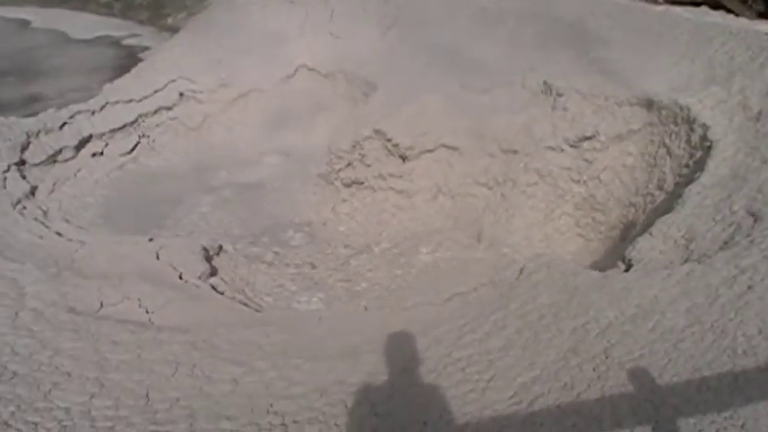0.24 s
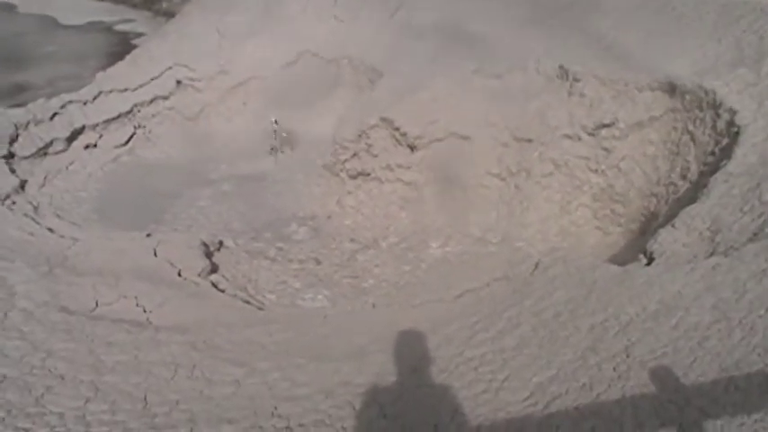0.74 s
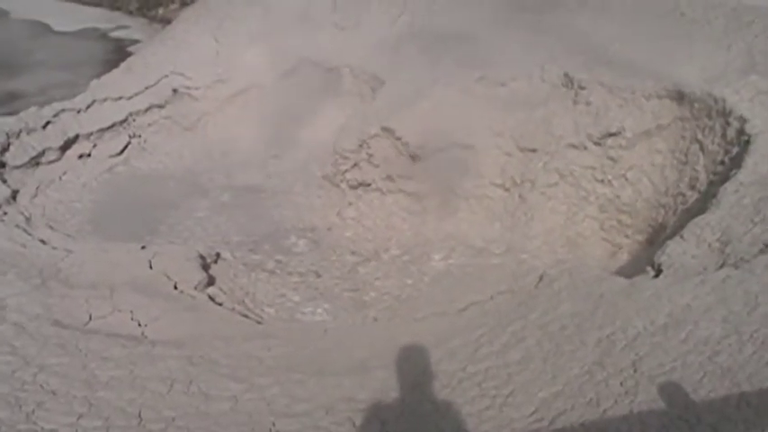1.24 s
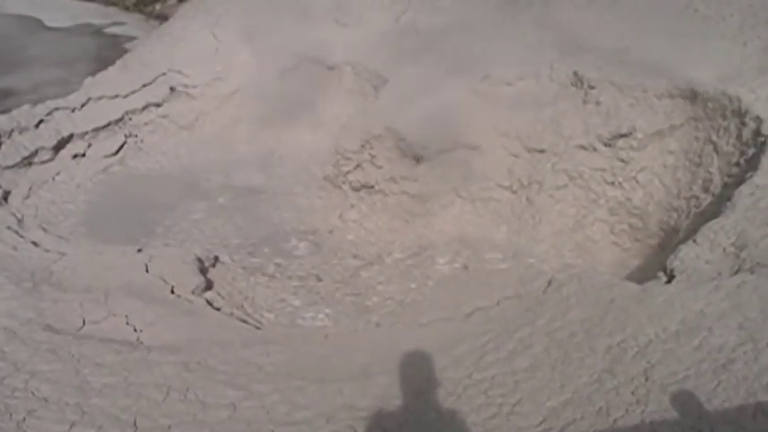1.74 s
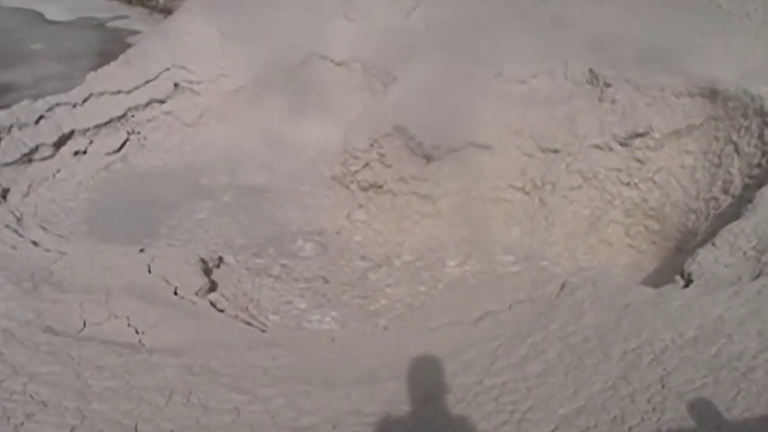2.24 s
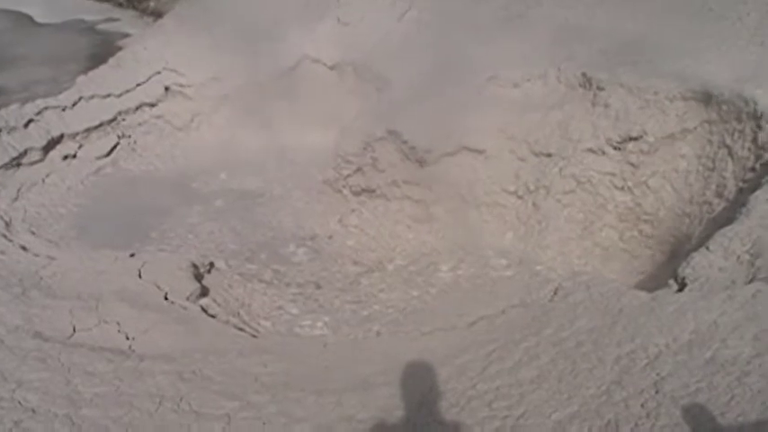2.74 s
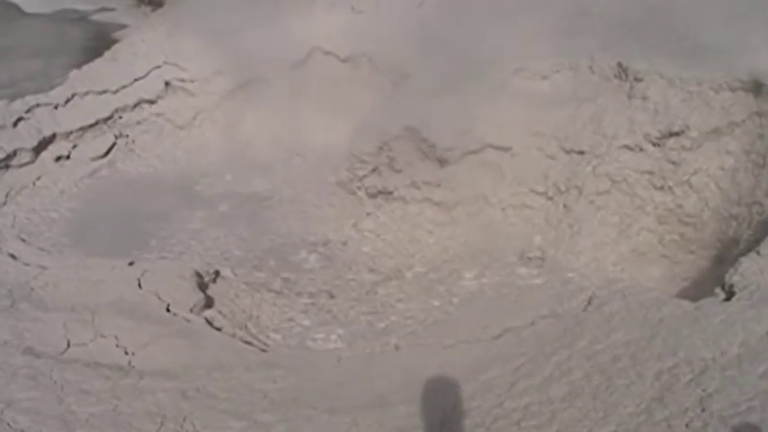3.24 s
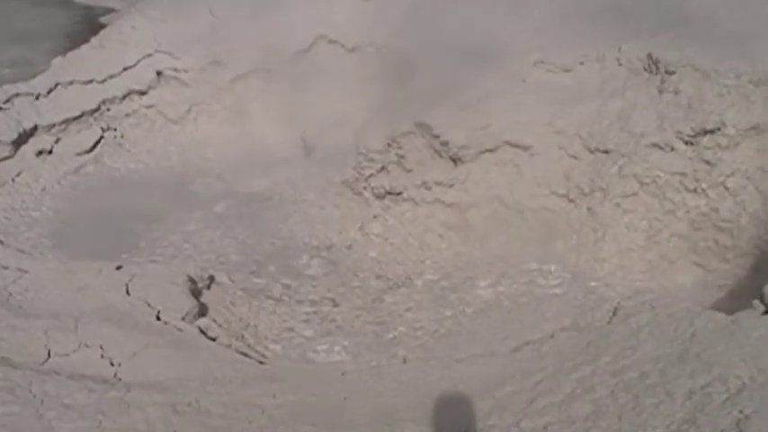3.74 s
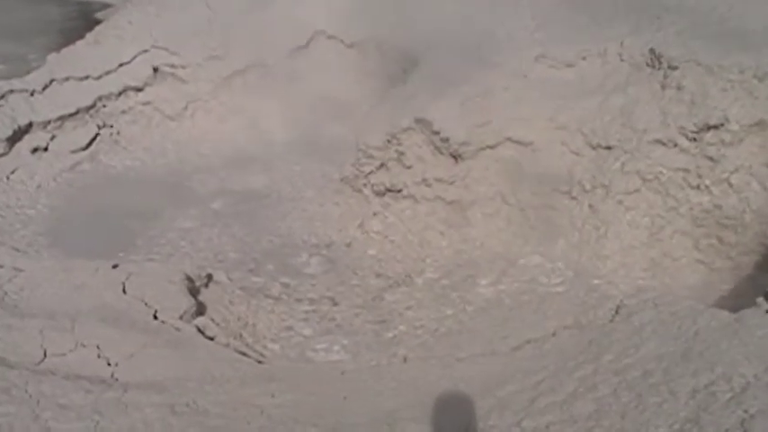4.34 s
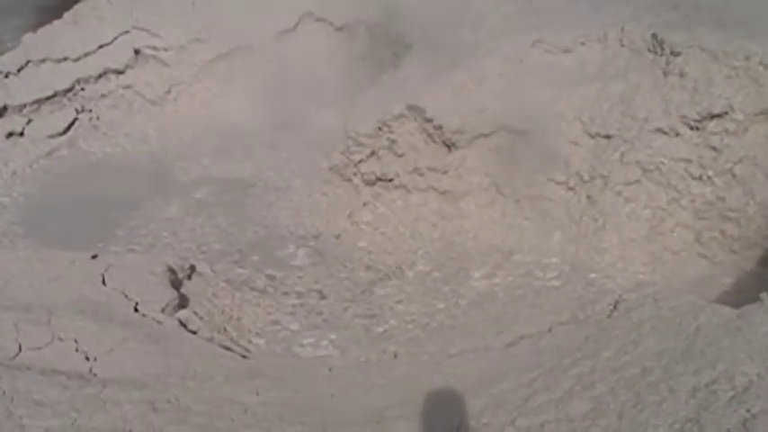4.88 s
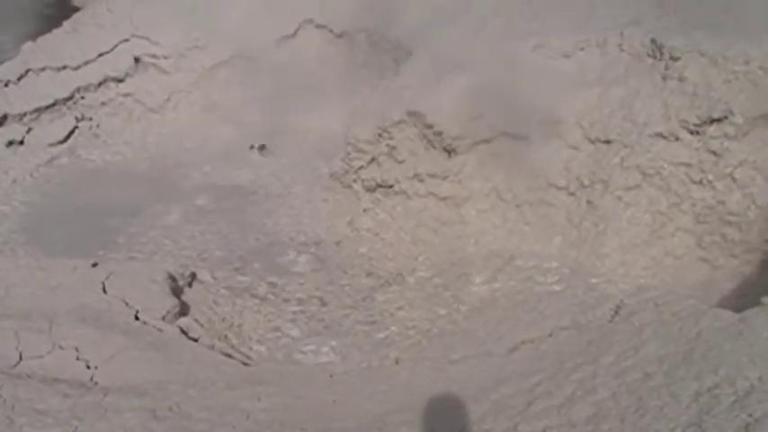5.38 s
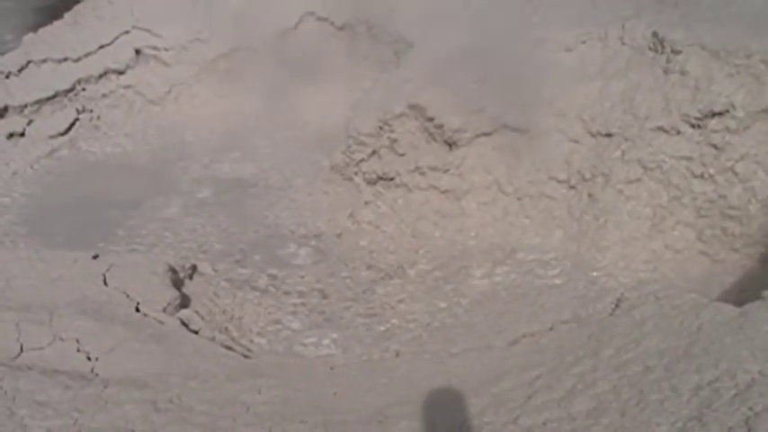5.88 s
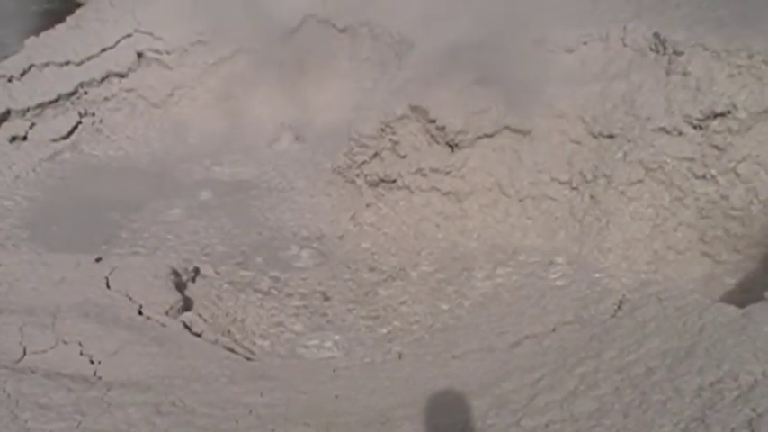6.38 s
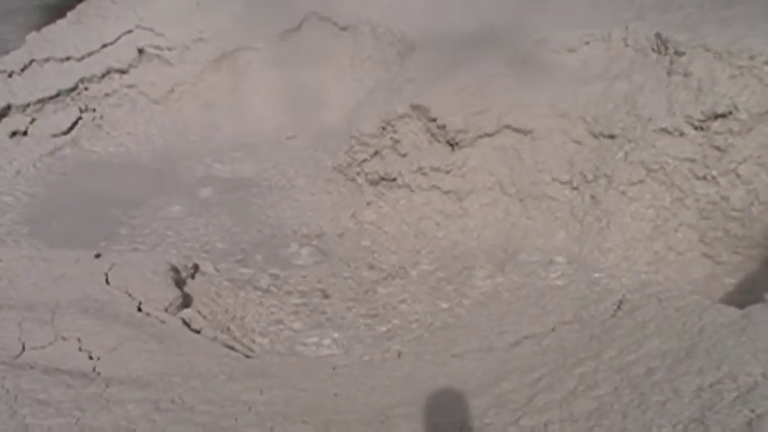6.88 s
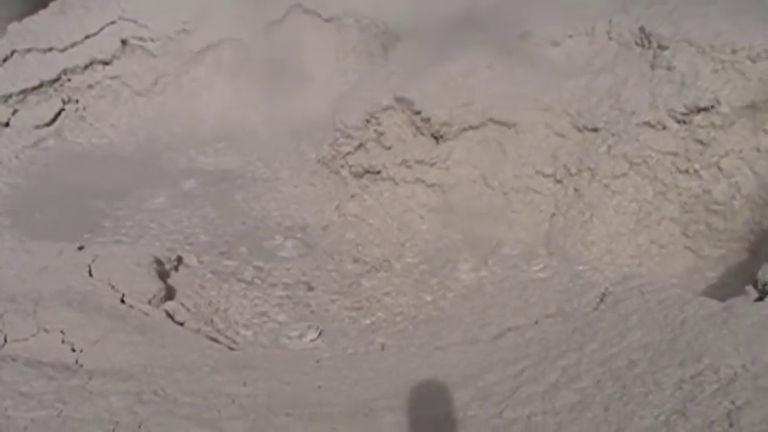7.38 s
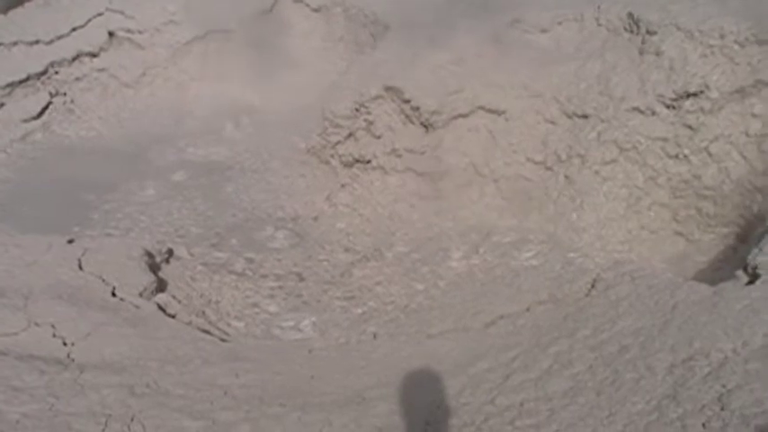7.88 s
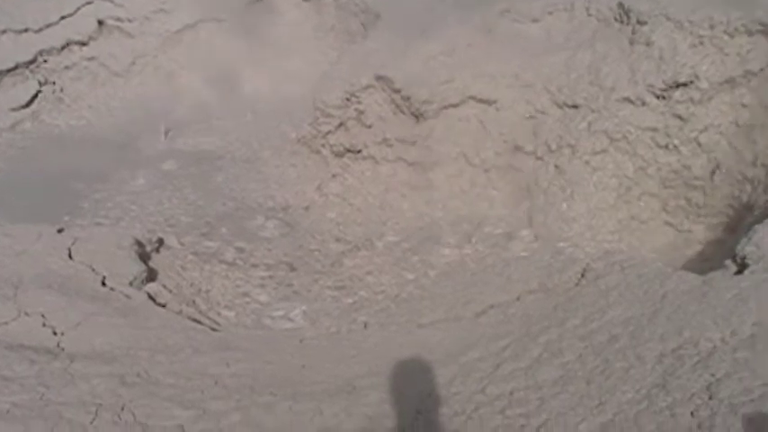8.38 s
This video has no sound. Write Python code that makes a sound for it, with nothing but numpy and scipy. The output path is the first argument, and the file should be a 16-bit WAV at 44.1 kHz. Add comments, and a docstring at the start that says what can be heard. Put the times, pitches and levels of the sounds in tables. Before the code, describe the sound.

A pot of thick mud boils outdoors, close in stereo. A soft, grainy simmer with fine wet spatter runs throughout, swelling and thinning unevenly. From the start to about 2.6 s a dry, raspy, high bird trill repeats about fifteen times a second, slowing slightly. Under it come small gulps, a clear hollow pop at 0.4 s, and a lively burst of spatter and sharp snaps around 0.9-1.1 s. After a sparser stretch, fuller plops come at 3.5 and 3.9 s, with pops near 4.5 s. A dense cluster of round gulps and splashes falls at 5.0-5.4 s, the heaviest low plop at 6.2 s, others at 7.45 and 8.0 s. From 2.6 s faint, high cricket chirps come in broken groups; weak rising bird calls appear after 7 s. Reflections are short, bass is thin, and a barely audible very high whine stays steady to the end at about 8.6 s.

```python
"""Boiling mud pot

A pot of thick mud boils in the open air. Steam pockets gulp as short gliding tones; bubbles pop open as
ringing cavities with noise bursts for splash and spray; flung specks snap as narrow bands of grit.
Coloured grit and small tonal bubbles make the simmer and spatter throughout. Far off, gliding whistles
make a bird's opening trill, its later calls and the crickets; the camera adds a faint steady whine.
"""
import sys
import numpy as np
from scipy import signal
from scipy.fft import rfft, irfft, next_fast_len
from scipy.io import wavfile
from scipy.ndimage import uniform_filter1d, map_coordinates

SR = 44100
rng = np.random.default_rng(int(sys.argv[2]) if len(sys.argv) > 2 else 0)


def digitize_waveform(pressure):
    """Quantize a signal to 16-bit integers and store it at the path in sys.argv[1].

    Rows of a 2-D input are taken as channels; values are limited to [-1, 1].
    """
    field = np.atleast_2d(pressure).T
    bounded = np.clip(field, -1, 1)
    quanta = np.round(bounded * 32767).astype(np.int16)
    wavfile.write(sys.argv[1], SR, quanta)


N = 380141
AGE = np.arange(SR // 8) / SR  # seconds since the start of one short event

# bubbles bursting open, levels ahead of the trims in pops(): start_s, ring_db, cavity_pitch_hz, splash_db
POPS = [(0.133, -32, 920, -38.5), (0.244, -31.5, 700, -35), (0.266, -29, 1880, -38.5),
        (0.4257, -17, 1250, -33.5), (0.7685, -31, 760, -34.5), (0.865, -29.5, 1720, -44),
        (0.9636, -30, 2110, -39.5), (1.017, -33, 1150, -35.5), (2.217, -34, 674, -32),
        (2.411, -40, 600, -63), (2.7365, -47, 990, -36), (3.045, -36.5, 870, -41),
        (3.0784, -24.5, 925, -39), (3.477, -46, 1160, -34.5), (3.522, -23.5, 873, -34.5),
        (3.533, -28, 860, -45), (3.8815, -31, 890, -42), (3.927, -19.5, 730, -43),
        (3.929, -21.5, 1630, -34), (3.9344, -24, 734, -52), (4.199, -32, 720, -50),
        (4.459, -22, 1120, -31.5), (4.471, -31, 820, -38), (4.493, -29.5, 1670, -37.5),
        (4.691, -34, 1166, -41), (4.971, -33.5, 602, -47), (5.011, -17.5, 2120, -35.5),
        (5.163, -31.5, 765, -61), (5.226, -30.5, 573, -34.5), (5.3446, -29, 1680, -39),
        (5.433, -29, 983, -48.5), (5.710, -20.5, 2070, -38), (6.223, -25.5, 636, -28.5),
        (6.2384, -22, 757, -50), (6.2443, -30, 860, -35.5), (6.548, -27, 2010, -38),
        (6.873, -24.5, 907, -41), (7.009, -40.5, 584, -62), (7.098, -39, 545, -30.5),
        (7.132, -32, 1120, -39), (7.460, -28.5, 1170, -38.5), (7.6776, -34, 696, -36.5),
        (7.9887, -18.5, 880, -33), (7.999, -24, 1310, -43), (8.141, -34, 1100, -40.5),
        (8.272, -32, 860, -63)]
# colour of the fine spray: frequency_hz, level_db (only the shape counts)
SPRAY = [(1500, 10.5), (3300, 10.5), (4600, 10), (7000, 9), (10000, 6.5), (13000, -11), (15500, -56)]
# the steady boil, ahead of its trims: time_s, simmer_db, spatter_db
BOIL = [(0.0, -49.5, -59), (0.19, -44.5, -60.5), (0.86, -47.5, -48.5), (1.32, -49.5, -61.5),
        (2.04, -52, -63), (3.02, -51.5, -67.5), (3.27, -51, -59.5), (4.05, -52, -64.5), (4.15, -51, -70),
        (5.42, -50, -64.5), (6.51, -49.5, -60), (6.96, -55, -69), (7.3, -47, -63.5), (7.78, -52, -63),
        (7.9, -49.5, -61), (8.62, -49.5, -65.5)]


def gulps():
    """Each pocket swells and the thick mud damps it at once; its pitch climbs unless a pop has opened it."""
    # steam pockets swelling under the mud: start_s, peak_db, pitch_at_peak_hz, swell_s
    pockets = [(0.096, -29.5, 169, 0.013), (0.138, -26, 315, 0.0035), (0.424, -28, 357, 0.0077),
               (0.695, -25, 256, 0.0064), (1.261, -28.5, 250, 0.0091), (1.402, -41, 264, 0.014),
               (1.71, -33.5, 305, 0.0066), (1.871, -24.5, 274, 0.0074), (2.28, -27.5, 254, 0.011),
               (2.544, -26, 254, 0.0067), (2.663, -38.5, 378, 0.0074), (3.475, -18.5, 278, 0.0022),
               (3.5006, -33, 400, 0.011), (3.8994, -19, 244, 0.0047), (4.197, -22.5, 262, 0.0034),
               (5.094, -26, 343, 0.0054), (5.162, -15.5, 233, 0.006), (5.221, -27, 427, 0.0078),
               (5.2386, -15.5, 310, 0.0023), (5.348, -22.5, 270, 0.0052), (6.072, -32.5, 276, 0.0082),
               (6.186, -12.5, 237, 0.0074), (6.212, -22.5, 344, 0.0076), (6.616, -34.5, 277, 0.0082),
               (6.638, -33.5, 320, 0.012), (7.455, -15, 237, 0.0073), (7.6749, -29, 410, 0.004),
               (7.964, -31, 229, 0.0084), (7.986, -22, 400, 0.0026), (8.23, -39, 326, 0.0095)]
    open_within_s = 0.02  # a pop this close in time has opened the pocket
    open_glide = 0.014  # an opened pocket barely climbs (share of its pitch)
    glide_per_s = 58  # a sealed one climbs by this share of its pitch for each second of swelling
    wrinkle_share = 0.13  # how far the collapsing pocket unsettles its pitch
    out = np.zeros((2, N))
    for s, db, hz, swell in pockets:
        opened = any(abs(pop[0] - s) < open_within_s for pop in POPS)
        glide = open_glide if opened else glide_per_s * swell
        u = AGE / swell
        climb = glide * np.tanh(u - 1)
        wrinkle = unit(uniform_filter1d(rng.standard_normal(len(u)), size=60))
        unsettled = wrinkle_share * np.tanh(u * u / 2) * wrinkle  # grows towards the tail
        pitch = hz * (1 + climb + unsettled)
        swelling = (u * np.exp(1 - u)) ** 3  # peaks at 1 after the swell time
        tone = np.sin(2 * np.pi * np.cumsum(pitch) / SR)
        add(out, s, amp(db) * swelling * tone, pan_db=1.2)
    return out


def pops():
    """Steam fizzes through the thinning skin, then it tears: cavity rings, rim splashes, fine spray flies."""
    # colour of the splashing rim: frequency_hz, level_db (only the shape counts)
    splash_colour = [(120, -25), (300, -4.5), (750, 26.5), (1600, 20), (2700, 23), (4000, -63.5),
                     (9000, -34)]
    # lower cavities burst lazily and fling less spray
    spray_full_hz, spray_db_per_octave = 950, 9
    # second mode: its pitch depends on the ragged shape of the hole
    overtone_ratio, overtone_spread, overtone_db = 2, 0.15, -14
    out = np.zeros((2, N))
    for s, db, hz, splash_db in POPS:
        spray_db = splash_db + spray_db_per_octave * np.log2(min(hz / spray_full_hz, 1))
        overtone_hz = hz * overtone_ratio * np.exp(rng.normal(0, overtone_spread))
        ring = amp(db + 3.5) * (cavity(hz) + amp(overtone_db) * cavity(overtone_hz))
        splash = amp(splash_db - 3) * burst(splash_colour, t60=0.087)
        spray = amp(spray_db) * burst(SPRAY, t60=0.067)
        wet_fizz = amp(splash_db - 3) * burst(splash_colour, t60=0.019)
        fine_fizz = amp(spray_db - 10.5) * burst(SPRAY, t60=0.035)
        add(out, s, ring + splash + spray, pan_db=rng.normal(0.4, 1))
        add(out, s - AGE[-1], (wet_fizz + fine_fizz)[::-1])  # reversed, it builds up to the pop
        for at, small_db, small_hz in satellites(s, splash_db):
            add(out, at, amp(small_db) * cavity(small_hz))
    return out


def cavity(hz):
    """One mode of an open cavity: a soft start, a climbing pitch and a set number of cycles."""
    ring_cycles = 26.3  # 60 dB down after this many starting periods, so small cavities are the shortest
    onset = 1 - np.exp(-AGE / 0.00019)
    return bubble(hz, rise=2.3) * fade(AGE, ring_cycles / hz) * onset


def bubble(hz, rise, t=AGE):
    """A cavity's tone climbs as its mouth opens; rise is the share of its pitch per second."""
    return np.sin(2 * np.pi * hz * (t + rise * t * t / 2))


def satellites(s, splash_db):
    """(start_s, level_db, pitch_hz) of the three small bubbles that a collapsing rim traps."""
    within_s, over_splash_db = 0.03, 6  # the later they come, the weaker
    return [(s + within_s * late, splash_db + over_splash_db - 9 * late, 1100 * 2 ** pitch)
            for late, pitch in rng.uniform([0.1, -1], [1, 1], (3, 2))]


def burst(spectrum, t60):
    """A dying shower of droplets with the energy of a unit noise under the same decay."""
    decay = fade(AGE, t60)
    drops = grit(len(AGE), spike_db=7)
    shower = unit(coloured(drops, spectrum) * decay)
    return shower * np.sqrt(np.mean(decay ** 2))


def snaps():
    """A sharp crack in a tiny, heavily damped cavity, then a trace of spray; fainter ones fall at random."""
    # tearing films and landing specks: start_s, level_db, pitch_hz
    cracks = [(0.213, -23.5, 2900), (0.366, -27, 2520), (0.571, -28.5, 2910), (0.623, -26, 7500),
              (0.682, -27.5, 10100), (0.8, -32, 6660), (0.932, -20.5, 3150), (0.963, -23, 7140),
              (1.034, -22.5, 2200), (1.0377, -19, 9900), (1.534, -21, 4220), (1.783, -29, 5200),
              (1.994, -30, 3300), (2.213, -21, 4400), (2.58, -28.5, 2900), (2.923, -19.5, 4260),
              (3.394, -28, 2700), (3.928, -22, 5000), (3.978, -34, 8500), (4.0651, -26, 7400),
              (4.155, -26.5, 7350), (4.426, -26, 4650), (4.716, -23.5, 7000), (4.779, -28, 2840),
              (5.24, -21.5, 4300), (5.712, -23.5, 2500), (5.776, -24.5, 6660), (7.845, -24, 2630),
              (8.089, -26.5, 5350), (8.125, -31.5, 5000), (8.141, -26.5, 2440)]
    rise_s, t60_s = 0.0004, 0.008
    width_share = 0.26  # bandwidth as a share of the pitch
    decay = fade(AGE, t60_s)
    envelope = decay * (1 - np.exp(-AGE / rise_s))
    out = np.zeros((2, N))
    for s, db, hz in cracks + specks(count=90):
        tear = grit(len(AGE), spike_db=2) * envelope
        width = width_share * hz

        def resonance(f):
            """A damped band around the pitch, its treble rolled off above 11.5 kHz."""
            band = 1j * f * width / (hz * hz - f * f + 1j * f * width)
            return band / (1 + (f / 11500) ** 8)

        crack = unit(filtered(tear, resonance)) * np.sqrt(np.mean(decay ** 2))
        spray = amp(db - 11) * burst(SPRAY, t60=0.023)
        add(out, s, amp(db) * crack + spray, pan_db=rng.normal(-1, 3))
    return out


def specks(count):
    """(start_s, level_db, pitch_hz) of faint snaps all over the pot, louder while it boils harder."""
    over_simmer_db, middle_hz = 11.5, 2420  # level over the untrimmed simmer, middle pitch
    s, simmer_db, _ = np.transpose(BOIL)
    return [(at, np.interp(at, s, simmer_db) + over_simmer_db + 3 * size, middle_hz * 3 ** pitch)
            for at, size, pitch in rng.uniform([0, -1, -1], [N / SR, 1, 1], (count, 3))]


def boil():
    """The pot simmers gently and surges now and then, with a fine spatter of mud raining back."""
    # colour of the simmering froth: frequency_hz, level_db (only the shape counts)
    simmer_colour = [(25, -40), (55, -19), (110, -23.5), (260, 4.5), (500, -2.5), (850, 2.5), (1400, -7.5),
                     (2600, -7.5), (3500, -15.5), (7000, -19), (15000, -72)]
    # colour of the falling spatter: frequency_hz, level_db (only the shape counts)
    spatter_colour = [(400, -70), (1700, 10), (3400, -5), (5000, 3.5), (7500, 2.5), (10000, 0.5),
                      (13000, -12), (15500, -24)]
    simmer, spatter = boiling()
    clumps = wobble(30)  # bubbles come in clumps, and the spatter with them
    froth = spread(coloured(grit((2, N), spike_db=7), simmer_colour))
    froth = patchy(amp(2.5 * clumps + 2.3 * wobble(220)) * froth, 3)
    drops = spread(coloured(grit((2, N), spike_db=7), spatter_colour))
    drops = patchy(amp(3.2 * clumps + 2.5 * wobble(400)) * drops, 2.5)
    small_bubbles = radiated(blips(10 * np.log10(simmer), count=380))
    return amp(0.5) * np.sqrt(simmer) * froth + amp(6.0) * np.sqrt(spatter) * drops + small_bubbles


def boiling():
    """Powers of simmer and spatter: the steady boil, the froth that each pop churns up, the splutters."""
    # short surges of steam, ahead of the trims in boil(): peak_s, half_width_s, level_db
    splutters = [(1.0, 0.018, -43), (1.121, .01, -49), (1.66, 0.033, -53), (1.907, 0.0098, -44.5),
                 (2.439, 0.032, -52), (2.71, 0.042, -48), (3.21, 0.054, -49), (3.838, 0.039, -44),
                 (4.15, 0.11, -47), (4.42, 0.045, -46.5), (4.698, 0.009, -49), (5.212, 0.032, -40),
                 (5.769, 0.018, -40), (5.845, .011, -51), (6.124, 0.012, -54.5), (6.373, 0.0076, -56),
                 (7.365, 0.011, -45), (7.71, 0.067, -43.5), (8.012, .02, -43.5), (8.1, 0.043, -45),
                 (8.435, 0.013, -52)]
    simmer_trim_db, spatter_trim_db = -3, -0.5
    # froth around a pop: level over its splash, half width, spatter over froth
    churn_db, churn_s, churn_spatter_db = -16.5, 0.053, -12.5
    # at this width spatter and simmer get equal power here; shorter splutters are brighter
    jet_s, jet_db_per_halving = 0.015, 6.5
    s, simmer_db, spatter_db = np.transpose(BOIL)
    t = np.arange(N) / SR
    churn = sum(surge(at, churn_s, splash_db + churn_db) for at, _, _, splash_db in POPS)
    simmer = amp(np.interp(t, s, simmer_db) + simmer_trim_db) ** 2 + churn
    spatter = amp(np.interp(t, s, spatter_db) + spatter_trim_db) ** 2 + amp(churn_spatter_db) ** 2 * churn
    for at, width, db in splutters:
        steam = surge(at, width, db)
        simmer = simmer + steam
        spatter = spatter + steam * amp(jet_db_per_halving * np.log2(jet_s / width)) ** 2
    return simmer, spatter


def surge(s, width, db):
    """The power of a smooth swell that peaks at time s."""
    distance = (np.arange(N) / SR - s) / width
    return amp(db) ** 2 * np.exp(-2 * np.minimum(distance ** 2, 20))


def blips(level_db, count):
    """Small bubbles all over the pot: a few cycles that the ragged rim unsettles, louder in a harder boil."""
    over_simmer_db = 11.5
    out, t = np.zeros((2, N)), AGE[:SR // 30]
    for place, (pitch, size, pan, rise) in zip(rng.random(count), rng.standard_normal((count, 4))):
        hz = 540 * np.exp(0.8 * min(abs(pitch), 2))  # 540 Hz is the lowest
        cycles = hz * (t + max(9 + 10 * rise, 0) * t * t / 2)  # the pitch climbs or holds
        ragged = np.cumsum(rng.standard_normal(len(t))) * np.sqrt(0.2 * hz / SR)
        shape = (1 - np.exp(-cycles / 0.4)) * np.exp(-cycles / 3.2)
        db = level_db[int(place * N)] + over_simmer_db + 3 * min(size, 2)
        tone = np.sin(2 * np.pi * cycles + ragged)
        add(out, place * N / SR, amp(db) * shape * tone, pan_db=2 * pan)
    return out


def patchy(pair, depth_db):
    """Every clump has its own colour: random gain patches about 1 kHz wide and 20 ms long."""
    z = signal.stft(pair, nperseg=256)[2]
    field = rng.standard_normal(z.shape[1:])
    field = uniform_filter1d(uniform_filter1d(field, size=5, axis=0), size=7, axis=1)
    gain = amp(depth_db * np.clip(unit(field), -2.5, 2.5))
    return unit(signal.istft(z * gain, nperseg=256)[1][:, :N])


def radiated(x):
    """Mouths this small radiate little deep bass."""
    return filtered(x, lambda hz: hz ** 3 / (hz ** 3 + 125 ** 3))


def bird():
    """A dry trill that slows a little: bunches of raspy, ever higher upstrokes, each with a short downstroke."""
    # level of the trill, without its echo: time_s, level_db
    trill = [(0, -40), (1.7, -40), (2.6, -42.5)]
    # far rising calls, without their echo: start_s, level_db, pitch_hz
    far_calls = [(6.97, -59, 2650), (7.2, -60, 2700), (7.595, -60, 2900), (8.2, -56, 3300)]
    first_s, syllable_s, slowing_s = 0.058, 0.0668, 3.8e-5
    rasp = 0.085  # share by which the upstrokes tremble in pitch
    out = np.zeros((2, N))
    for k in np.arange(38):
        s = first_s + syllable_s * k + slowing_s * k * k
        db = np.interp(s, *np.transpose(trill))
        for stroke in range(4):
            hz, start = 4000 + 350 * stroke, s - 0.033 + 0.0055 * stroke
            upstroke = sweep(hz, 1.55 * hz, 0.012, rasp)
            add(out, start, amp(db - 5 + rng.normal(0, 2)) * upstroke)
        add(out, s - 0.005, amp(db) * sweep(6470, 5730, 0.0095, rasp / 2))
    for s, db, hz in far_calls:
        add(out, s, amp(db) * sweep(hz, 1.11 * hz, 0.05))
    return out + amp(-8) * echo(out, [(6000, 0.39)])


def crickets():
    """Each wing stroke is a short note that sags as the wing slows."""
    # cricket chirps, mean stroke level without echo: start_s, end_s, level_db
    chirps = [(2.621, 3.17, -58), (3.341, 3.92, -51), (4.1, 4.33, -49.5), (4.554, 5.14, -52.5),
              (5.239, 6.55, -53.5), (6.787, 6.97, -51), (7.272, 7.46, -51.5), (7.588, 8.2, -55.5),
              (8.326, 8.55, -51)]
    spacing_s, scatter_db = 0.029, 2.2
    length_s, start_hz, end_hz = 0.017, 6400, 5820  # one stroke, before a small pitch scatter
    out = np.zeros((2, N))
    for start, end, db in chirps:
        for s in np.arange(start, end, spacing_s):
            late, pitch, size_db = rng.normal([0, 1, db], [0.004, 0.018, scatter_db])
            add(out, s + late, amp(size_db) * sweep(start_hz * pitch, end_hz * pitch, length_s))
    return out + amp(-4) * echo(out, [(6000, 0.15)])


def sweep(start_hz, end_hz, length, rough=0):
    """One softly edged gliding whistle; rough is the share by which its pitch trembles."""
    u = np.arange(int(length * SR)) / (length * SR)
    tremble = 1 + rough * unit(uniform_filter1d(rng.standard_normal(len(u)), size=16))
    pitch = (start_hz + (end_hz - start_hz) * u) * tremble
    return np.sin(np.pi * u) * np.sin(2 * np.pi * np.cumsum(pitch) / SR)


def echo(x, t60s):
    """The scattered sound that comes back."""
    return signal.fftconvolve(x.mean(axis=0)[None], tail(t60s), axes=1)[:, :N]


def tail(t60s):
    """A stereo reverberation tail, its left side at energy 1, from noise that decays band by band."""
    hz, t, z = signal.stft(rng.standard_normal((2, SR // 4)), SR, nperseg=256)
    pair = signal.istft(z * fade(t, along(t60s, hz)[:, None]), SR, nperseg=256)[1]
    return pair / np.linalg.norm(pair[0])


def amp(db):
    """Decibels to gain."""
    return 10 ** (np.asarray(db) / 20)


def unit(x):
    """x at rms 1."""
    return x / np.sqrt(np.mean(x ** 2) + 1e-20)


def fade(t, t60):
    """Exponential decay, 60 dB down after t60."""
    return np.exp(-np.log(1000) * t / t60)


def along(points, hz):
    """(Hz, value) points read on a log frequency axis."""
    f, v = np.transpose(points)
    return np.interp(np.log(hz + 1), np.log(f), v)


def wobble(rate):
    """A smooth random curve, rate knots a second."""
    knots = rng.standard_normal(int(N * rate / SR) + 4)
    return map_coordinates(knots, [np.arange(N) * rate / SR])


def filtered(x, response):
    """x times a response of frequency."""
    n = x.shape[-1]
    m = next_fast_len(n + 4096)  # padded, so the end does not wrap onto the start
    return irfft(rfft(x, m) * response(np.fft.rfftfreq(m, 1 / SR)), m)[..., :n]


def coloured(x, spectrum):
    """x with the given colour, at rms 1."""
    return unit(filtered(x, lambda hz: amp(along(spectrum, hz))))


def grit(shape, spike_db):
    """Tiny impacts of log-normal size: the wider their spread, the more single ones stand out."""
    size_db = spike_db * np.clip(rng.standard_normal(shape), -3.5, 3.5)
    return rng.standard_normal(shape) * amp(size_db)


def spread(pair):
    """Two unrelated signals become a partly alike left and right."""
    # how alike left and right are: frequency_hz, correlation (no unit)
    alike = [(30, 0.15), (200, 0.57), (1000, 0.68), (12000, 0.71)]

    def mid_side(hz):
        """Shares of middle and side that give the likeness."""
        turn = np.arccos(np.clip(along(alike, hz), -1, 1)) / 2
        return np.array([np.cos(turn), np.sin(turn)])

    mid, side = filtered(pair, mid_side)
    return unit(np.array([mid + side, mid - side]))


def add(track, s, sound, pan_db=0):
    """Mix a sound into a stereo track at time s; a positive pan leans left."""
    start = int(np.clip(round(s * SR), 0, N))
    part = sound[:N - start]
    track[:, start:start + len(part)] += amp([[pan_db / 2], [-pan_db / 2]]) * part


def scene():
    """The pot between its banks, which scatter little bass, with the wildlife behind it."""
    # the answer of the mud banks: frequency_hz, t60_s
    banks = [(1500, 0.12), (10000, 0.07)]
    mud = radiated(gulps() + pops() + snaps())
    scattered = filtered(echo(mud, banks), lambda hz: hz * hz / (hz * hz + 400 ** 2))
    return mud + amp(-12) * scattered + boil() + bird() + crickets()


def record(dry):
    """The camera thins the deep bass, whines faintly and keeps nothing above its band limit."""
    whine_hz, top_hz = 15734, 15950
    whine = amp(-83.5) * np.sin(2 * np.pi * whine_hz * np.arange(N) / SR)
    return filtered(dry + whine, lambda hz: 1j * hz / (45 + 1j * hz) * (hz < top_hz))


dry = scene()
out = record(dry)
digitize_waveform(out)
```